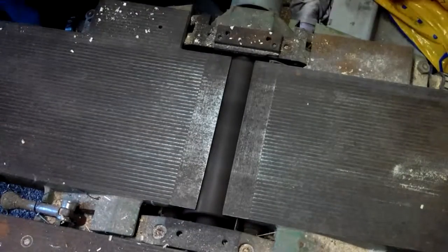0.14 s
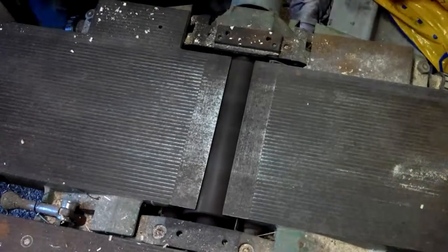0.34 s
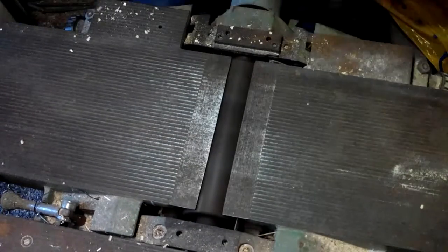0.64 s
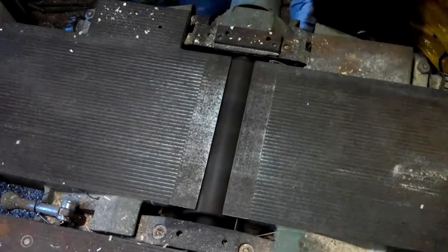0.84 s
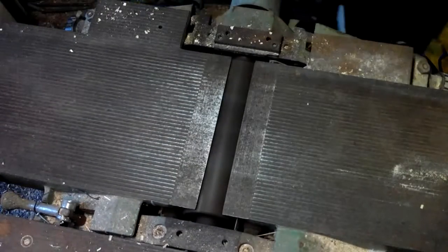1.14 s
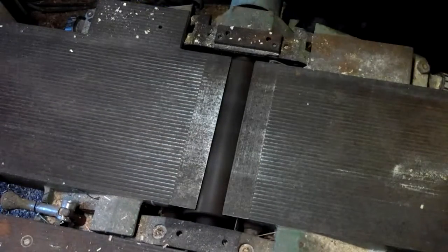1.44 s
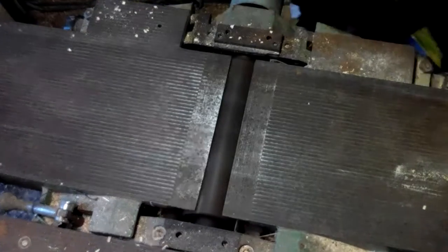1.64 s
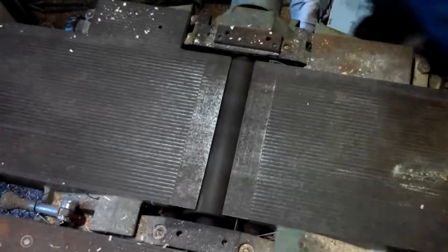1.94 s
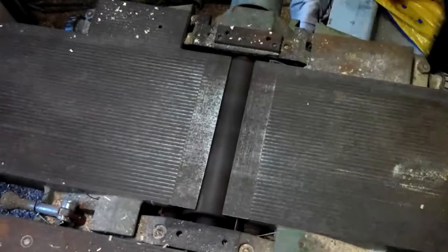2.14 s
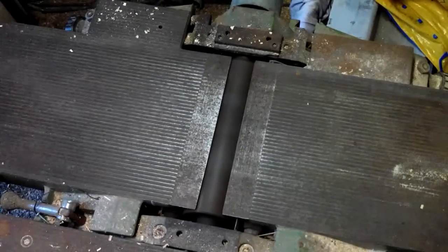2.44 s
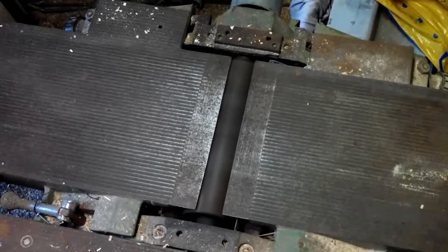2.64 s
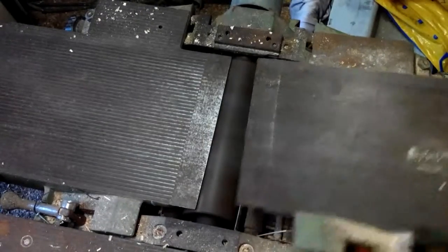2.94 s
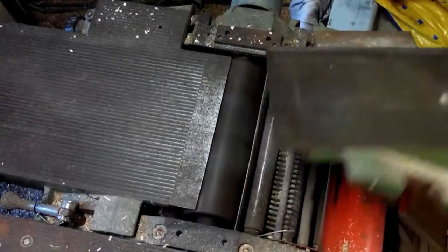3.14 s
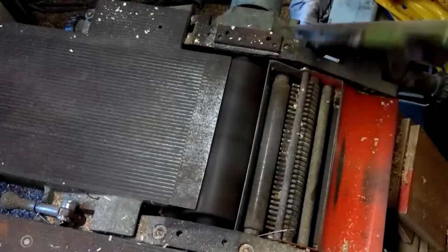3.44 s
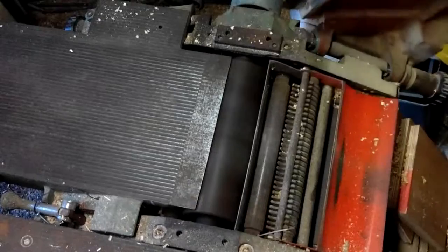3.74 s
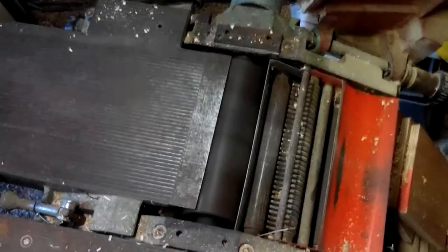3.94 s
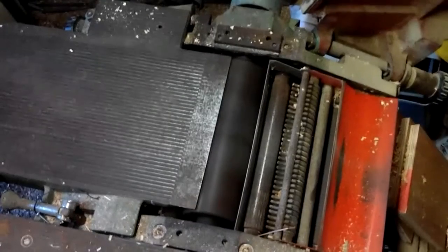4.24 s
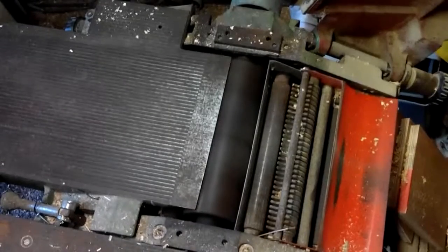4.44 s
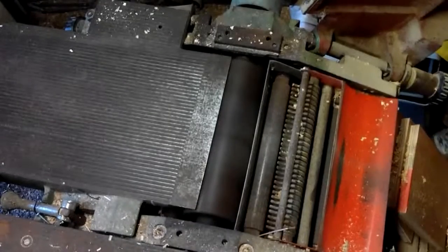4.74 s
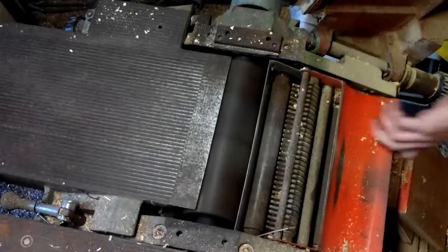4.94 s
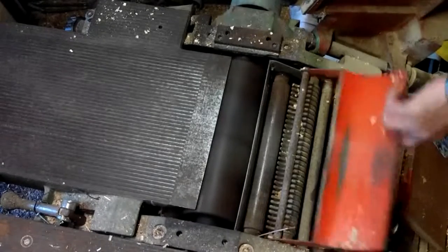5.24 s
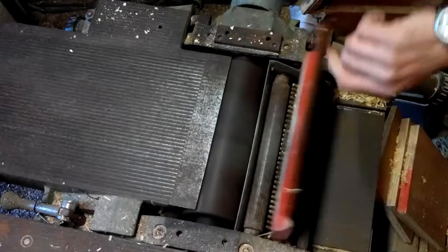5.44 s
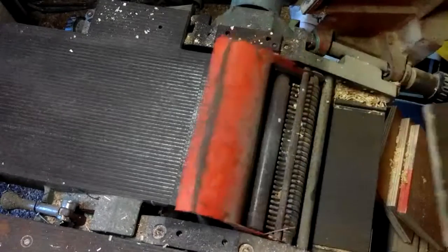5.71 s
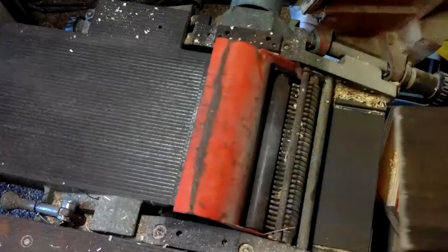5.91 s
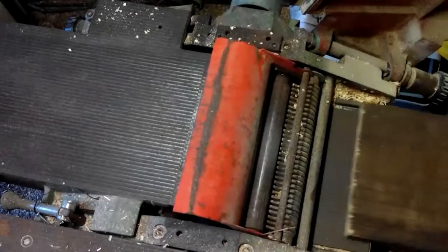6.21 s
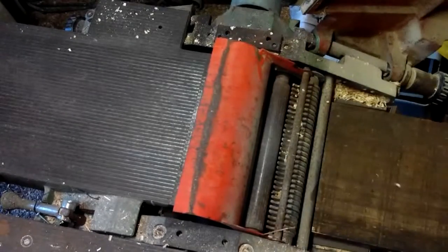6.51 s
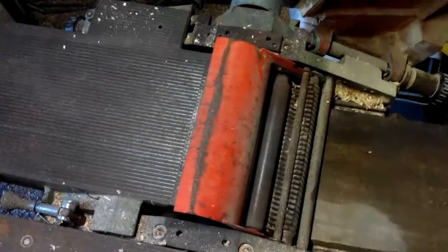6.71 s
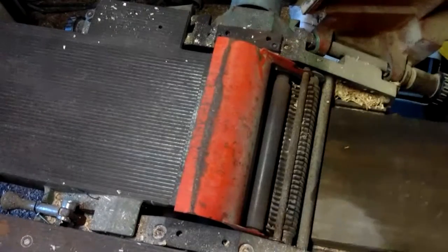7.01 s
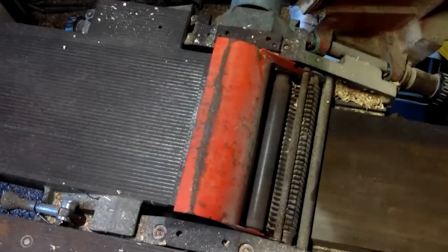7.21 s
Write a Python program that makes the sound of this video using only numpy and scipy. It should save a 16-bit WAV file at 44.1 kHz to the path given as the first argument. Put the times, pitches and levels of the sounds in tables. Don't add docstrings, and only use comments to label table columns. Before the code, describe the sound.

A woodworking planer idles close to the microphone in a small cluttered workshop, a low steady drone around 250 hertz with motor hum and rushing air. A table is swung off with a soft scrape and knock, making the whir brighter. A sheet-metal hood flips over with a loud rattling clank. After small wooden bumps, the knives bite a board with a harsh raspy roar.

```python
import sys
import numpy as np
from scipy import signal
from scipy.fft import rfft, irfft
from scipy.io import wavfile
from scipy.ndimage import uniform_filter1d, map_coordinates

SR = 44100
rng = np.random.default_rng(int(sys.argv[2]) if len(sys.argv) > 2 else 0)


def master_out(mix):
    frames = np.transpose(np.atleast_2d(mix))
    ceiling = np.clip(frames, -1, 1)
    pcm = np.round(ceiling * 32767).astype(np.int16)
    wavfile.write(sys.argv[1], SR, pcm)


def ratio(d):
    e = np.asarray(d, float) / 20
    return 10 ** e


N = 325006
TIME = np.arange(N) / SR
SLOW = np.arange(0, N + 64, 64) / SR
KNIFE_HZ = 251.95


def curve(rows, column=1, t=TIME):
    rows = np.array(rows)
    return np.interp(t, rows[:, 0], rows[:, int(column)])


def read(points, hz):
    f, value = np.transpose(points)
    return np.interp(np.log(hz + 1), np.log(f + 1), value)


def fine(v):
    return np.interp(TIME, SLOW, v)


def evened(x):
    return x / np.sqrt(np.mean(x ** 2) + 1e-20)


def wander(rate):
    return map_coordinates(rng.standard_normal(1200), [SLOW * rate + 3], order=3)


def resonate(x, hz, width):
    r = np.exp(-np.pi * width / SR)
    return 2 * signal.lfilter([1 - r], [1, -r * np.exp(2j * np.pi * hz / SR)], x).real


def dying_rings(table, rise_s):
    out, t = np.zeros(N), np.arange(12000) / SR
    for s, db, hz, t60 in table:
        start = round(s * SR)
        ring = (1 - np.exp(-t / rise_s)) * np.sin(2 * np.pi * hz * t)
        out[start:start + len(t)] += ratio(db - 60 * t / t60) * ring
    return out


# time in seconds,
# state (0 head covered, 1 open, 2 hood over, 3 board on the bed).
SETUP = [
    (0, 0),
    (2.95, 0),
    (3.22, 1.87),
    (4.4, 1.16),
    (5.3, 1.67),
    (5.6, 1.47),
    (5.85, 2),
    (6.704, 2),
    (6.713, 3),
    (7.37, 2.5),
]


def blend(levels_db):
    state = curve(SETUP, t=SLOW)
    if len(levels_db) == 3:
        levels_db = np.array(levels_db)[[0, 1, 1, 2]]
        late_s = 0.21
        state = np.where(state < 1.8, curve(SETUP, t=SLOW - late_s), state)
    return np.interp(state, np.arange(4), levels_db)


# frequency in Hz, phase in radians by which the left leads.
PORTS = [(0, 0.4), (600, -0.045), (1000, 0.44), (2000, 0.6), (2400, 0.35), (3500, 0.68)]


def tone(hz, lag, level_db, lean_db):
    turn = fine(ratio(level_db)) * np.exp(1j * (2 * np.pi * hz * TIME + fine(lag)))
    port = ratio(lean_db / 2) * np.exp(.5j * read(PORTS, hz))
    return np.sqrt(2) * np.array([(turn * port).real, (turn / port).real])


def grid(hop):
    return np.fft.rfftfreq(4 * hop, 1 / SR), np.arange(N // hop + 5) * hop / SR


# frequency in Hz, side over mid in dB.
WIDTH = [(40, -9.5), (90, -5.5), (200, -13.5), (450, -14), (800, -4), (2200, -11.5), (3300, -3), (5000, 2),
         (6500, 2.5)]
# frequency in Hz, left over right in dB.
LEAN = [(60, 2), (160, 1), (400, 2.5), (1040, 3.5), (2700, 2), (6990, 5.5)]


def noise(level_db, patchy_db, hop=256):
    hz = np.fft.rfftfreq(4 * hop, 1 / SR)
    a, b, c, d, patches = rng.standard_normal((level_db.shape[1], len(hz), 5)).T
    patches = evened(uniform_filter1d(uniform_filter1d(patches, 10, 0), 12, 1))
    mid = a + 1j * b
    side = (c + 1j * d) * ratio(read(WIDTH, hz))[:, None]
    lean = ratio(read(LEAN, hz) / 2)[:, None]
    z = np.array([lean * mid + side, mid / lean - side]) * ratio(level_db + patchy_db * patches)
    scale = np.sqrt(SR * 1.5 / (4 * hop))
    return scale * signal.istft(z, nperseg=4 * hop, noverlap=3 * hop)[1][:, :N]


def hum(table, base_hz, flutter_db, drift, scatter=1, order_flipped=0):
    out = np.zeros((2, N))
    for order, *levels in table:
        hz = base_hz * np.round(2 * order) / 2
        lag = 2 * np.pi * scatter * rng.random() + np.pi * (order == order_flipped)
        lag = lag + drift * np.sqrt(order) * wander(5)
        out += tone(hz, lag, blend(levels) + flutter_db * wander(6), read(LEAN, hz))
    return out


def room(x):
    taps, t = np.zeros((2, 12000)), np.arange(12000) / SR
    at = np.arange(150, 11980, 20) + rng.integers(0, 20, (2, 592))
    np.put_along_axis(taps, at, rng.choice([-1., 1.], at.shape), 1)
    taps *= ratio(-60 * t / 0.17)
    return signal.fftconvolve(x, taps / np.linalg.norm(taps[0]), axes=1)[:, :N]


# multiple of 300.3 Hz, level in dB covered, open, with the board.
MAINS = [(1, -36, -35.5, -39), (2, -46.5, -52, -46), (3, -61.5, -56, -66.5)]


def mains():
    shaft = .4 * np.cos(2 * np.pi * 24.55 * TIME)
    belt_beat = .4 * np.cos(2 * np.pi * 16.65 * TIME + 1)
    return (1 + shaft + belt_beat) * hum(MAINS, 300.3, 0.82, 0.077)


BELT_HZ = 8.467
# multiple of the lap rate, level in dB covered, open, with the board.
BELT = [(10, -72, -59, -62), (11, -55, -51, -60), (12, -47, -45, -48), (13, -47, -46, -57),
        (14, -56, -53, -64), (15, -45, -42, -59), (16, -55, -52, -60), (19, -61, -61, -65),
        (22, -59, -60, -65), (24, -59, -60, -65)]


def belt():
    return hum(BELT, BELT_HZ, 2.0, 0.05, scatter=.1, order_flipped=13)


# multiple of 24.016 Hz, level in dB covered, open, with the board.
MOTOR = [(5, -57, -54, -61), (6, -52, -51, -68), (7, -49, -50, -65), (9, -55, -59, -65),
         (12, -50, -50, -59), (13, -55, -51, -50), (14, -55, -54, -77), (16, -51, -47, -77),
         (17.5, -44, -47, -48), (18, -35.5, -47, -43), (21.5, -56, -51, -65), (24.5, -58, -53, -71),
         (27, -41, -43, -41), (29.5, -64, -62, -68), (34.5, -65, -59, -66), (35, -63, -56, -68),
         (36, -56, -46, -53), (39.5, -62, -60, -73), (45, -58, -53, -54), (48, -61, -57, -67),
         (48.5, -68, -56, -68), (54, -59, -59, -53), (81, -58, -51, -52), (90, -60, -55, -64),
         (144, -69, -62, -87), (66.5, -64, -62, -66), (87.5, -63, -60, -66)]


def motor():
    return hum(MOTOR, 24.016, 2.0, 0.06)


# frequency in Hz, level in dB per Hz covered, open, hood over, with the board.
AIR = [(38, -96.5, -84.5, -80, -92), (65, -85.5, -88, -86, -92), (94, -79.5, -69, -69, -70),
       (139, -69.5, -82.5, -79.5, -77), (293, -69.5, -66, -58.5, -69.5), (445, -68, -64, -68, -71.5),
       (660, -74.5, -71.5, -72.5, -81), (1020, -78, -76.5, -75, -77.5), (1400, -77.5, -75, -71, -80.5),
       (2030, -78, -74.5, -77, -83), (3370, -79, -76, -77, -85.5), (5000, -87.5, -85, -84, -92),
       (6590, -100, -97, -97.5, -103), (7200, -113, -110, -107, -138)]


def air():
    hz, t = grid(hop=512)
    table, state = np.array(AIR), curve(SETUP, t=t)
    share = np.array([np.interp(state, np.arange(4), row) for row in np.eye(4)])
    field = np.array([read(table[:, [0, k]], hz) for k in range(1, 5)]).T @ share
    casing = 7 * np.exp(-((hz - 428) / 26) ** 2) + 4 * np.exp(-((hz - 650) / 25) ** 2)
    casing = casing - 5 * np.exp(-((hz - 365) / 25) ** 2) - 3 * np.exp(-((hz - 1380) / 70) ** 2)
    bearing = 4 * np.exp(-((hz - 5450) / 160) ** 2)
    uncovered = 3 * np.exp(-((hz[:, None] - 420) / 50) ** 2) * (1 - share[0])
    ticks = 5.4 * np.clip((hz[:, None] - 6800) / 1200, 0, 1) * rng.exponential(0.49, len(t))
    level_db = field + ticks + (casing + bearing)[:, None] - uncovered + 0.34
    return noise(level_db, patchy_db=2.0, hop=512) * (1 + 0.12 * np.cos(2 * np.pi * KNIFE_HZ * TIME))


# peak in seconds, level in dB, rise in seconds, fall in seconds.
RUMBLE = [
    (2.879, -37, .15, .1),
    (3.0, -41.5, 0.073, 0.091),
    (4.15, -51, 0.26, 0.33),
    (5.0, -49.5, .3, .12),
    (6.32, -44, .08, 0.089),
    (6.45, -38, 0.12, 0.064),
    (6.69, -47, 0.12, 0.022),
]


def swells(t):
    slope_db, rest_db = -15.5, -62.5
    drags = [db + slope_db * np.maximum((s - t) / rise, (t - s) / fall) for s, db, rise, fall in RUMBLE]
    return np.max(drags + [rest_db + 0 * t], axis=0)


def rumble():
    hz, t = grid(hop=512)
    colour = read([(30, -48.0), (70, -32.5), (110, -27.5), (180, -20.0), (300, -22.5), (700, -37.5),
                   (1500, -60.0), (4000, -100)], hz)
    return noise(colour[:, None] + swells(t), patchy_db=5.0, hop=512)


# start in seconds, level in dB, pitch in Hz, t60 in seconds.
THUDS = [(6.158, -27, 412, .1), (6.288, -26, 613, 0.08), (6.29, -25, 684, .08), (6.328, -19.5, 196, 0.087),
         (6.33, -23.5, 126, .1), (6.352, -27, 362, .08), (6.422, -21.5, 607, 0.099),
         (6.428, -24.5, 660, .1), (6.426, -22.5, 125.5, 0.1), (6.428, -23, 200, .07), (6.44, -25, 448, .1),
         (6.49, -27, 423, .1), (6.575, -27, 427, .15)]


def board_thuds():
    return dying_rings(THUDS, 0.0053)


# start in seconds, level in dB, settling in dB per second.
CHATTER = [
    (5.884, -18, 149),
    (5.945, -31, 70),
    (6.07, -36, 330),
]


def settling():
    shake_db_per_s = 3000
    shakes = [db - np.maximum(shake_db_per_s * (s - TIME), fall * (TIME - s)) for s, db, fall in CHATTER]
    return np.max(shakes, axis=0)


# frequency in Hz, level in dB.
CHATTER_COLOUR = [(900, -13.5), (1600, -3), (3280, 3.5), (5090, -4), (7300, -20), (8300, -28.5),
                  (9500, -20.5), (11300, -29.5)]


def chatter():
    hz, t = grid(hop=64)
    hiss = evened(noise(read(CHATTER_COLOUR, hz)[:, None] + 0 * t, patchy_db=1.5, hop=64))
    return hiss * ratio(settling() + 1.0 * fine(wander(130)))


# start in seconds, level in dB, pitch in Hz, t60 in seconds.
RINGS = [(5.878, -25, 5094, .5), (5.89, -27, 4500, .4), (5.885, -27, 4300, .25), (5.885, -28, 2700, .2),
         (5.874, -24, 4300, .1), (5.876, -27, 3000, .12), (5.92, -36, 2720, .3), (5.93, -36, 2900, .3),
         (5.992, -31, 5134, .12), (5.992, -27, 4230, .08), (5.878, -24, 1640, .12), (5.992, -30, 1405, .08)]


def hood_rings():
    return dying_rings(RINGS, .003) * ratio(np.array([[1.5], [-1.5]]))


# frequency in Hz, level in dB, t60 in seconds.
HOOD = [(1100, -4, .03), (1400, -3, .04), (1630, 0, .04), (2100, -8, .03), (3150, -2, .05), (3600, -5, .02),
        (4250, -4, .03), (4600, -1, .035), (5100, -5, .08), (5500, -5, .04), (6100, -15, .02),
        (7000, -18, .02)]
# start in seconds, blow in dB, loudest ring in Hz, length of the blow in seconds,
# pan in dB to the left.
KNOCKS = [(2.992, -23.5, 3490, 0.0057, -0.5), (2.993, -25, 1400, 0.0053, 1.5), (2.993, -29, 4500, .004, 0),
          (3.0, -27, 3020, .006, 0), (5.254, -27, 4200, 0.0044, 2.5), (5.873, 0.5, 4570, 0.0044, 2),
          (5.872, -10, 3140, 0.0043, 1.5), (5.876, -7, 1630, 0.011, 0), (5.89, -22, 4520, .004, 0),
          (5.925, -25, 3400, 0.0045, -1), (5.953, -24.5, 2200, .004, 0), (5.992, -14.5, 3170, 0.0077, 1.5),
          (5.993, -14, 4140, 0.0077, -1), (5.992, -19, 5870, .006, 1), (5.993, -13.5, 1078, 0.0035, 1.5),
          (6.064, -22, 4450, 0.0054, 1), (6.066, -27.5, 5540, .004, -1.5),
          (6.085, -33.5, 3300, 0.0037, -0.5), (6.26, -39, 5000, 0.0034, -1.5),
          (6.365, -38.5, 5000, 0.0027, 0), (6.8, -35, 4200, 0.0087, 4)]


def knocks():
    own_ring, own_t60_s = 0.5, 0.045
    out, t = np.zeros((2, N)), np.arange(6000) / SR
    for s, db, loudest_hz, length, pan_db in KNOCKS:
        start, shared = round(s * SR), rng.standard_normal(len(t))
        for side in range(2):
            scrape = shared + 0.29 * rng.standard_normal(len(t))
            blow = scrape * np.exp(-t / length) * np.minimum(t / 0.0012, 1)
            width = 0.4 * loudest_hz
            crack = resonate(resonate(blow, loudest_hz, width), loudest_hz, width)
            sound = 0.31 * crack + 0.011 * resonate(blow, 9600, 2500)
            for hz, mode_db, t60 in HOOD:
                near_db = -35 * abs(np.log2(hz / loudest_hz))
                sound += 3 * ratio(mode_db + near_db) * resonate(resonate(blow, hz, 1500), hz, 4.4 / t60)
            own = ratio(-60 * t / own_t60_s) * (1 - np.exp(-t / 0.0015)) * np.sin(2 * np.pi * loudest_hz * t)
            sound = (1 - own_ring) * sound / abs(sound).max() + own_ring * own
            out[side, start:start + len(t)] += ratio(db + pan_db * (1.0 - side)) * sound
    return out


# time in seconds, bite in dB, share of tearing noise 0-1.
CUT = [(7.12, -22.5, .4), (7.15, -8, 0.4), (7.156, -5.5, 0.5), (7.168, -1, .35), (7.19, 1, 0.35),
       (7.215, -2, 0.4), (7.245, 0.5, .3), (7.26, -0.5, 0.15), (7.32, -1, 0.2), (7.37, -0.5, 0.25)]
# place in a turn 0-1, level in dB, first reach of the wood in seconds.
BITES = [(.14, 1, 7.1), (.49, -3.5, 7.16), (.77, 0, 7.17)]
# frequency in Hz, width in Hz, top in dB,
# loudest at seconds, fade in dB per second.
BOARD = [(1400, 390, -37.5, 7.26, 41), (1720, 200, -35, 7.31, 59), (1930, 39, -31, 7.275, 76),
         (2190, 100, -36, 7.32, 91), (2510, 200, -32, 7.26, 60), (2780, 280, -24.5, 7.28, 85),
         (3190, 120, -32, 7.285, 121), (3400, 340, -25.5, 7.225, 110), (3600, 200, -31, 7.35, 130),
         (3740, 250, -35, 7.16, 150), (4260, 300, -30.5, 7.17, 150), (4150, 500, -28.5, 7.34, 100),
         (4800, 500, -32, 7.295, 90), (5100, 900, -33, 7.19, 79), (5200, 380, -29.5, 7.33, 110),
         (3600, 2400, -30, 7.27, 20.5), (6100, 1200, -31.5, 7.36, 50), (10000, 2700, -51, 7.37, 28.5)]
# frequency in Hz, left over right in dB.
BOARD_LEAN = [(1400, 1), (1930, -1), (2770, 2.5), (3350, 4.5), (5150, 0.5), (6500, -2)]


def cut():
    first_bite_s = 7.155
    entry_s = 0.0033
    grain_s = .06
    turn_hz = .9985 * KNIFE_HZ / 3
    cut_from = round(7.0 * SR)
    t = TIME[cut_from:]
    strikes, puffs = np.zeros(len(t)), np.zeros(len(t))
    for place, db, reach_s in BITES:
        turns = turn_hz * t - place + .0008 * fine(wander(30))[cut_from:]
        height = ratio(db + 2.4 * fine(wander(40))[cut_from:])
        height = height * np.clip(0.33 + (t - reach_s) / 0.057, .3, 1)
        hits = height * (np.diff(np.floor(turns), prepend=np.floor(turns[0])) > 0)
        for patch in range(6):
            edge = rfft(rng.standard_normal(600) * np.exp(-TIME[:600] / entry_s))
            edge = irfft(edge / abs(edge))
            under = np.cos(.5 * np.pi * np.clip((t - first_bite_s) / grain_s - patch, -1, 1))
            struck = signal.oaconvolve(under * hits, evened(edge))[:len(t)]
            strikes += (t > first_bite_s) * struck
        puffs += height * np.exp(-(turns % 1) / 0.11)
    share, out = np.clip(curve(CUT, column=2, t=t), 0, .4), np.zeros((2, N))
    for side in range(2):
        tearing = np.diff(puffs * rng.standard_normal(len(t)), prepend=0)
        contact = (1 - share) * evened(strikes) + 1.5 * share * evened(tearing)
        late = np.roll(contact, 2 * side)
        late = late / np.sqrt(uniform_filter1d(late ** 2, 1050) + 1e-9)
        for k, (hz, width, db, top_s, fade) in enumerate(BOARD):
            ring = resonate(resonate(late, hz, 2 * width), hz, width)
            ring = ring / np.sqrt(abs(uniform_filter1d(ring ** 2, size=1575)) + 1e-12)
            level_db = db - fade * abs(t - top_s) + curve(CUT, t=t) + read(BOARD_LEAN, hz) * (.5 - side)
            out[side, cut_from:] += (-1) ** k * ratio(level_db) * ring
    return out * (TIME > CUT[0][0])


# time in seconds, length in seconds, change in dB,
# multiple.
PARTIAL_SWINGS = [(.05, .2, -3.5, 6), (.6, 0.23, -2.5, 2), (0.77, 0.091, -5.5, 6), (1.8, 0.26, -6.5, 6),
                  (3.45, 0.12, -1.5, 6), (3.09, 0.071, -3, 2), (3, 0.17, -1, 2), (3.03, 0.083, -6, 6),
                  (3.34, 0.11, 3.5, 6), (3.25, 0.12, -1, 2), (3.53, 0.28, 4, 6), (5.48, 0.069, -13, 6),
                  (5.6, 0.49, 1, 2), (6.4, 0.04, -7, 6), (7.03, 0.042, -5.5, 6), (3.1, .07, 5, 4),
                  (3.1, .07, 5, 5), (4.05, 0.14, -2.5, 6), (4.7, .12, -4, 6), (5.4, .15, 4, 6),
                  (7.36, 0.046, -7, 6), (1.5, 0.42, -2.5, 3), (7.37, 0.066, -7.5, 5), (2.2, .2, 4, 7),
                  (1.5, .2, -1.5, 7), (5.5, .15, 2.5, 7), (1.25, 0.17, -4, 8), (2.1, 0.18, 2, 8),
                  (4.4, 0.33, 1, 8), (3.05, .15, -6, 9), (1.1, 0.17, -3, 13), (6.85, .15, 1.5, 2),
                  (2.1, 0.11, 0.5, 6), (2.25, 0.18, 1, 2), (6.2, .2, -9, 8), (6.9, 0.22, -0.5, 13),
                  (3.1, .05, -3.5, 7), (3.12, 0.08, -5.5, 6), (3.09, .06, -2, 8), (3.1, 0.092, 4, 1),
                  (2.5, .2, -2, 3), (2.08, .08, 2.5, 3), (2.1, .1, 3.5, 6), (4.9, .3, 0, 6), (3.5, .2, 0, 8),
                  (3.6, .08, -5.5, 8), (6.55, .15, -4, 6), (7.3, .3, -7, 9), (6.7, 0.45, 0, 7), (.2, .25, 1, 3)]


def partial_swing(order):
    sag_db = {1: -1.5, 2: 2}.get(order, 0)
    eased = np.clip((SLOW - 1.0) / (2.8 - 1.0), 0, 1) * np.clip(1 - curve(SETUP, t=SLOW), 0, 1)
    passing = sum(db * np.exp(-((SLOW - s) / length) ** 2)
                  for s, length, db, k in PARTIAL_SWINGS if round(k) == order)
    return sag_db * eased + passing


# multiple of the knife rate, level in dB covered, open, hood over,
# with the board, left over right in dB.
KNIVES = [(1, -20, -26, -26, -23.5, -1.55), (2, -28, -25.5, -25.5, -27.5, 2), (3, -35, -34, -33, -34, 2.5),
          (4, -55.5, -55.5, -43.5, -48, -1.5), (5, -57, -57.5, -45, -44.5, 3.5),
          (6, -45, -33, -41, -39, 4.5), (7, -55, -41.5, -45, -43.5, 0), (8, -44.5, -40, -46.5, -47, 4),
          (9, -52.5, -40.5, -47.5, -53, 1.5), (10, -62, -48, -55, -46.5, 4.5),
          (11, -52.5, -47.5, -54.5, -59, -3), (12, -54.5, -51.5, -51.5, -55, 4),
          (13, -48.5, -45, -46.5, -46.5, 1), (14, -64.5, -56.5, -58, -62.5, 5),
          (15, -59.5, -64.5, -61.5, -69.5, 9.5), (16, -63.5, -58, -59, -64, -8.5),
          (17, -68.5, -63, -60, -73, 3), (18, -64.5, -57.5, -64, -63, 5.5)]
LOADED = {1: -3, 2: 1.4, 3: 9.2, 5: 16, 6: 5.9}


def knives():
    lap = 2 * np.pi * BELT_HZ * SLOW
    sway = 0.21 * wander(1.19) + 0.029 * np.sin(lap)
    load = np.clip((SLOW - 7.17) / 0.04, 0, 1)
    out = np.zeros((2, N))
    for order, (_, *levels, lean) in enumerate(KNIVES, 1):
        lag = 2.3 * (order - 1) + (rng.uniform(-2, 2) if order > 3 else 0)
        lag = lag + (order == 2) * blend([2., 0, .2, .1]) + (order == 3) * .35
        level = blend(levels) + partial_swing(order) + load * LOADED.get(order, 0)
        level = level + (0.23 + 0.048 * order) * wander(9) + 0.32 * np.cos(lap)
        if order == 2:
            lean = lean + fine(blend([0.37, -0.86, -.8, -0.64]))
        eddies = 0.012 * order * wander(20) + 0.05 * (order - 1) * wander(1.5)
        out += tone(order * KNIFE_HZ, order * sway + lag + eddies, level, lean)
    return out


def scene():
    machine = knives() + motor() + belt() + mains() + air()
    work = knocks() + cut() + hood_rings()
    dull = read([(5200, -1.0), (6500, -8.0), (7600, -7.0), (8400, -13.0), (9200, 1.5), (11000, 0.5)],
                np.fft.rfftfreq(N, 1 / SR))
    work = irfft(rfft(work) * ratio(dull), N)
    return machine + rumble() + board_thuds() + chatter() + work + ratio(-9) * room(work)


# start in seconds, depth in dB, fall in seconds, hold in seconds.
DUCKS = [
    (5.852, -13.5, 0.014, 0.048),
    (5.935, -3.5, .01, 0.043),
    (5.986, -7.5, .008, .016),
    (7.148, -7, 0.03, 0.18),
]


def camera_gain():
    recover_db_per_s = 210
    change_s, change_db, change_half_s = 6.709, -19, .0065
    ducks = []
    for s, db, fall, hold in DUCKS:
        recovered = recover_db_per_s * np.maximum(TIME - s - fall - hold, 0)
        ducks.append(np.minimum(db * np.clip((TIME - s) / fall, 0, 1) + recovered, 0))
    return np.min(ducks, axis=0) + change_db * np.maximum(1 - abs(TIME - change_s) / change_half_s, 0)


def roll_off(x):
    return signal.sosfilt(signal.butter(12, 11300, fs=SR, output="sos"), x)


def record(dry):
    hz = np.fft.rfftfreq(N, 1 / SR)
    microphone = read([(20, -14.5), (80, -0.5), (4500, 0.0), (6500, 6.0), (7400, 5.5), (8300, 1.5),
                       (11500, -5.5)], hz)
    heard = irfft(rfft(dry) * ratio(microphone), N)
    fade_in = np.minimum(.3 + TIME / .002, 1)
    return roll_off(heard * ratio(camera_gain()) * fade_in)


dry = scene()
out = record(dry)
master_out(out)
```